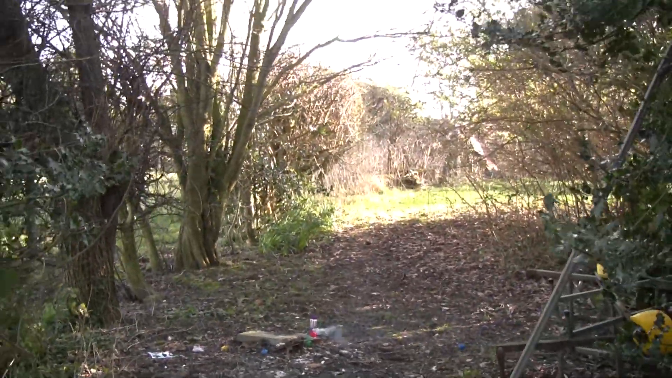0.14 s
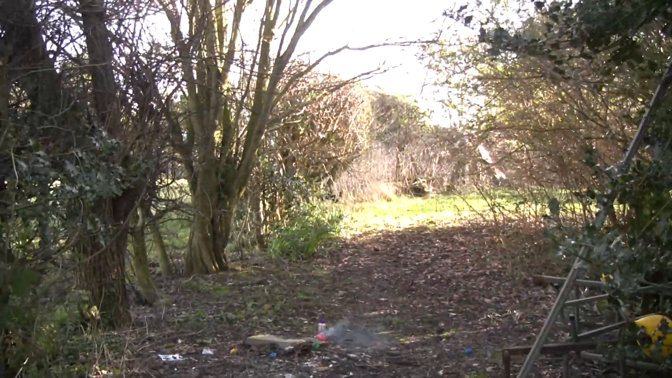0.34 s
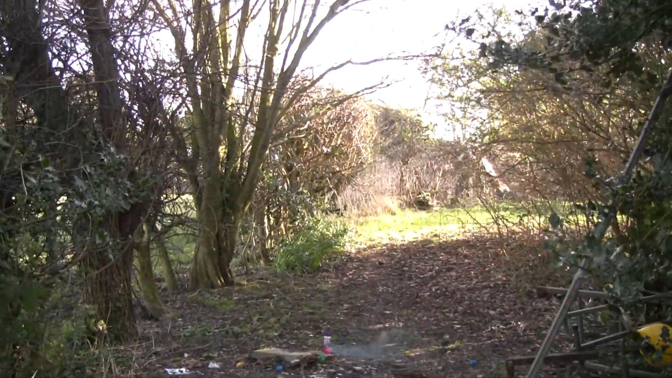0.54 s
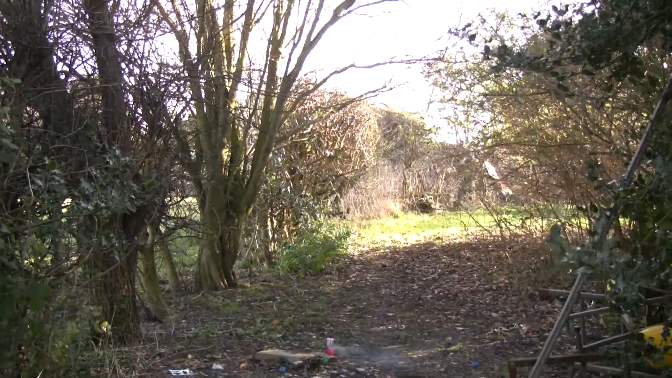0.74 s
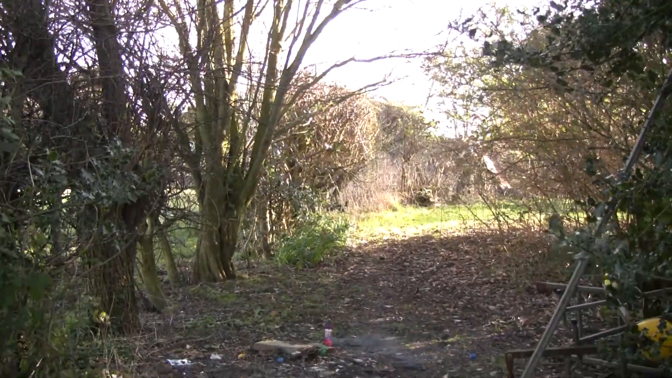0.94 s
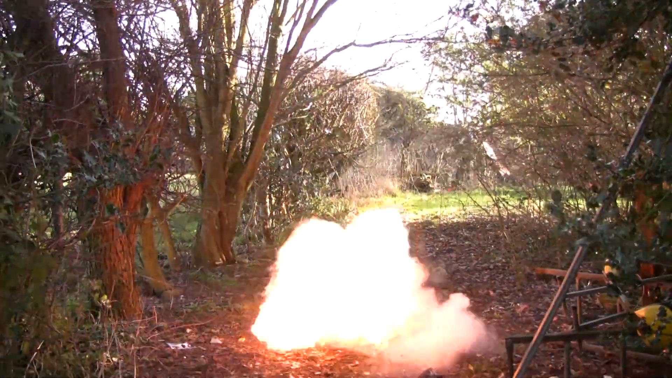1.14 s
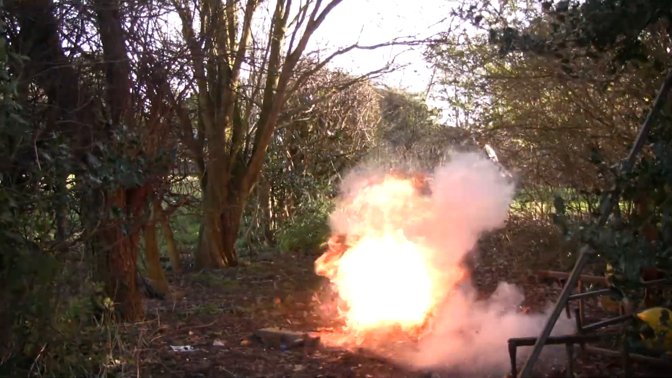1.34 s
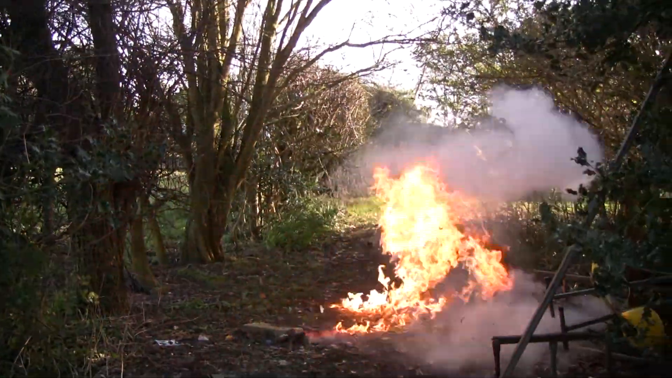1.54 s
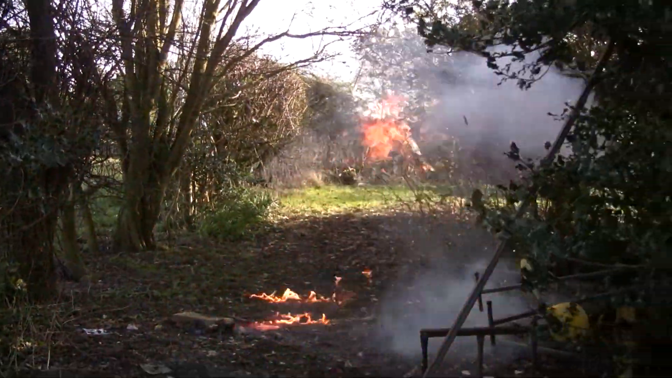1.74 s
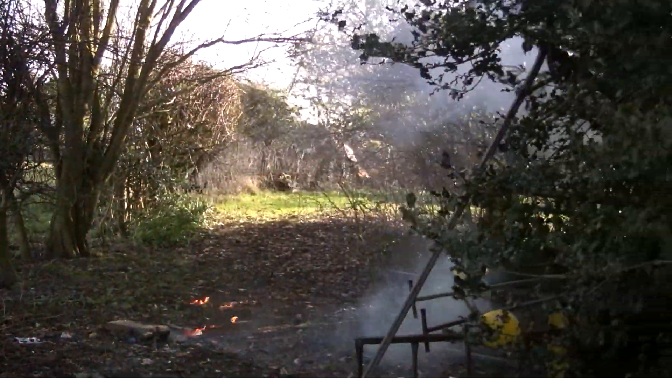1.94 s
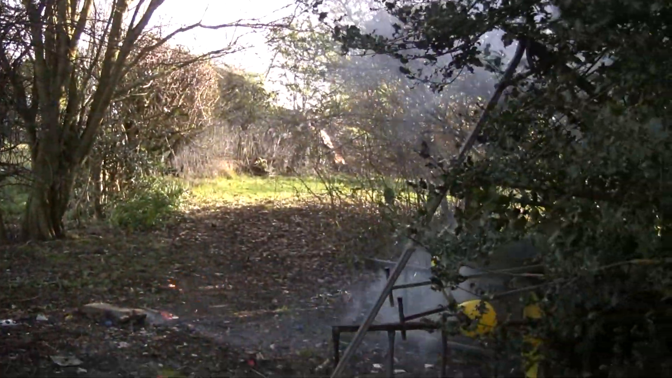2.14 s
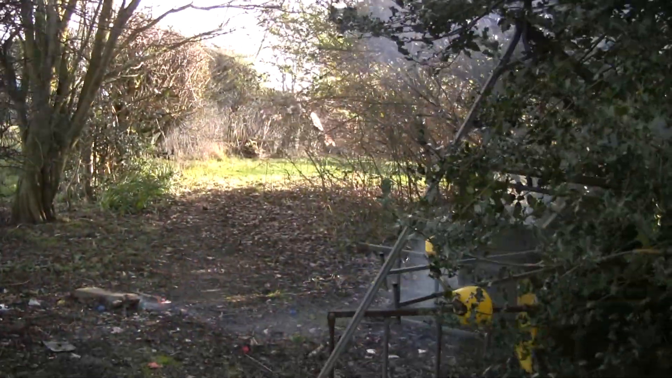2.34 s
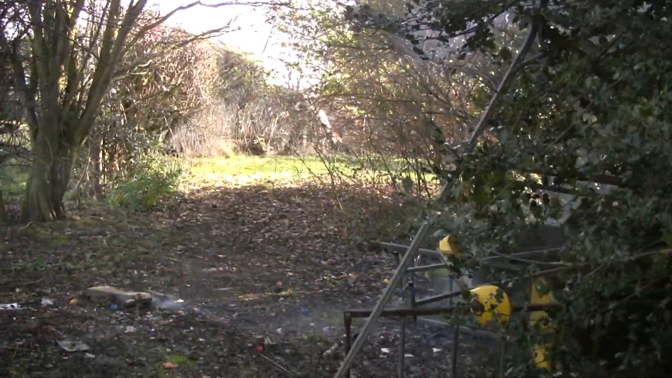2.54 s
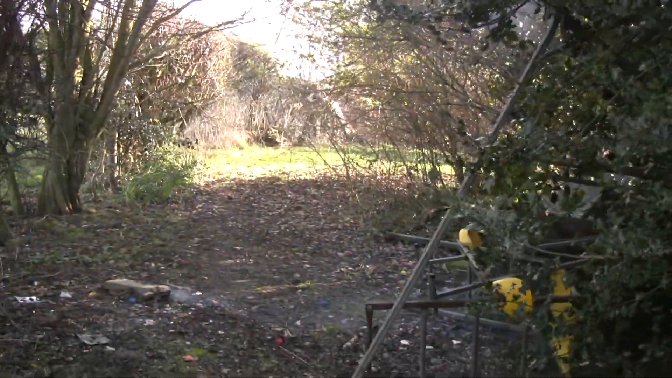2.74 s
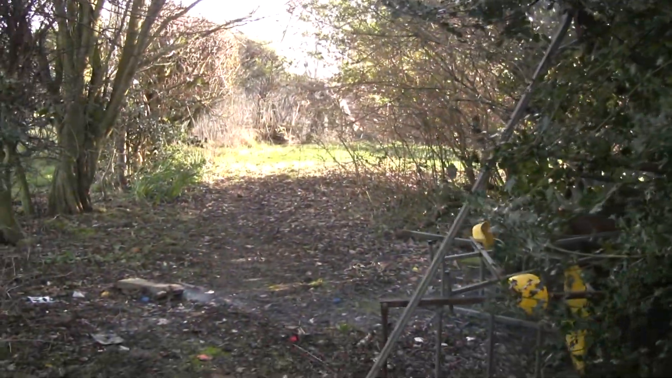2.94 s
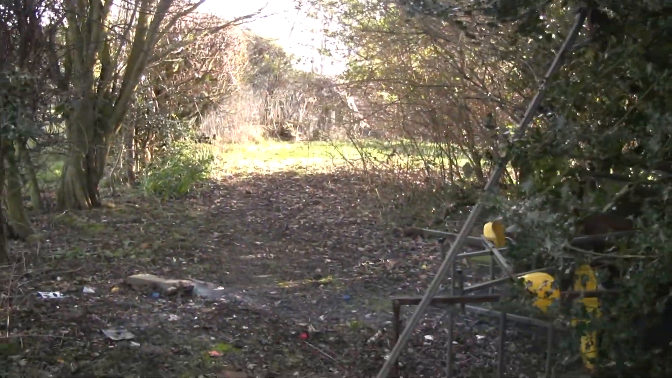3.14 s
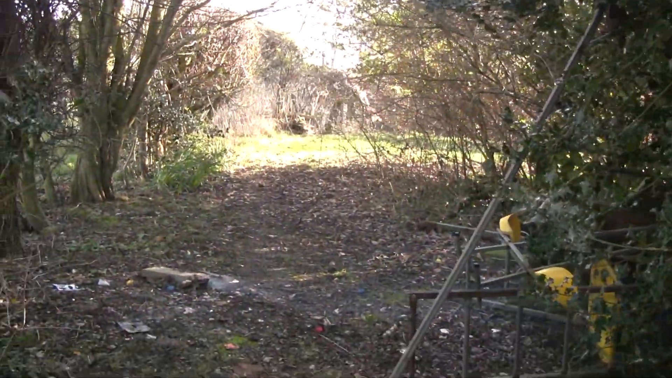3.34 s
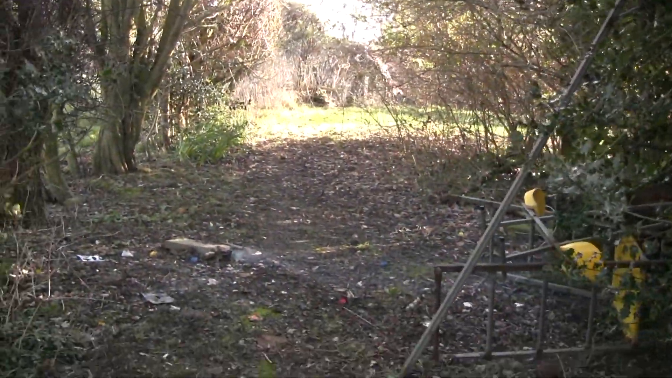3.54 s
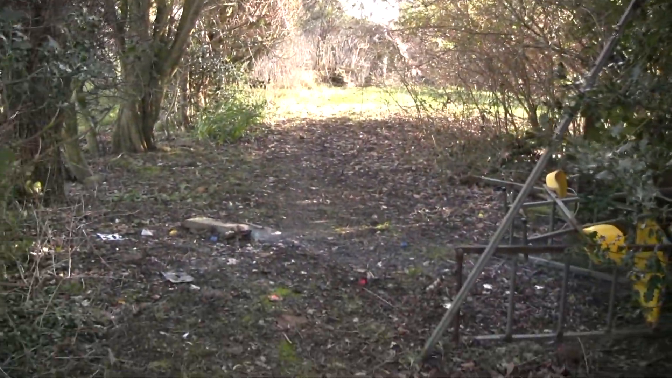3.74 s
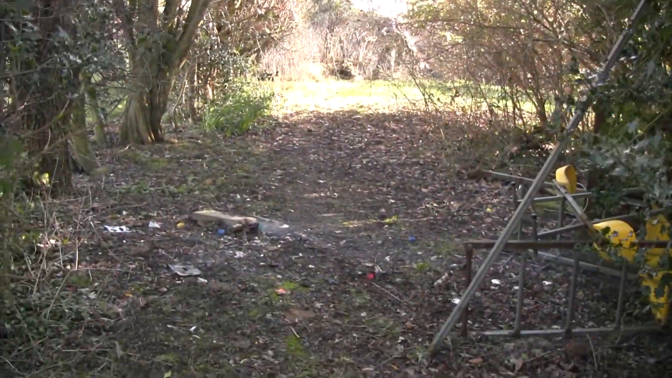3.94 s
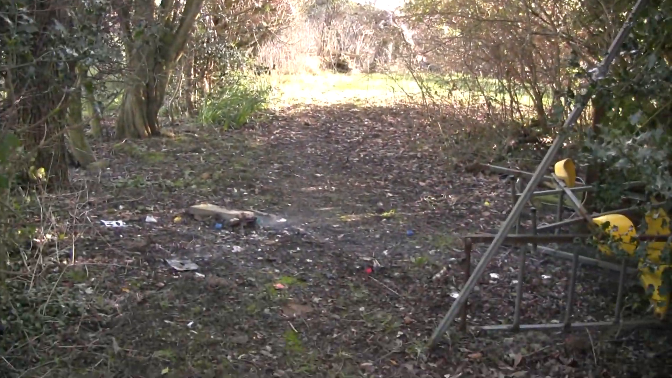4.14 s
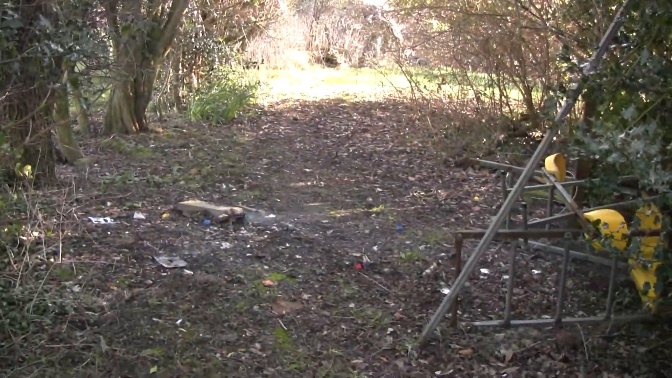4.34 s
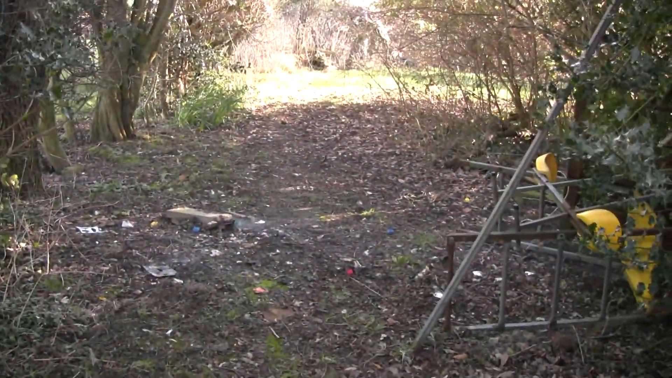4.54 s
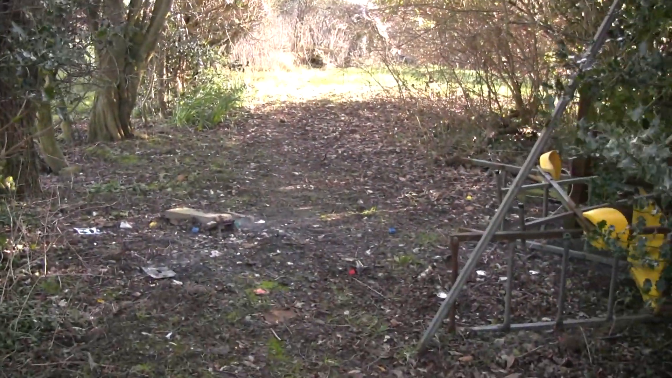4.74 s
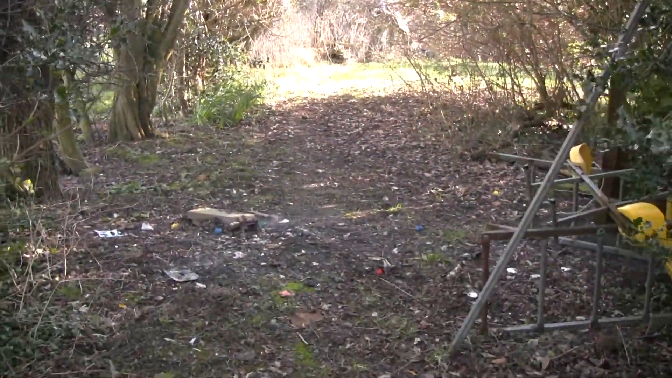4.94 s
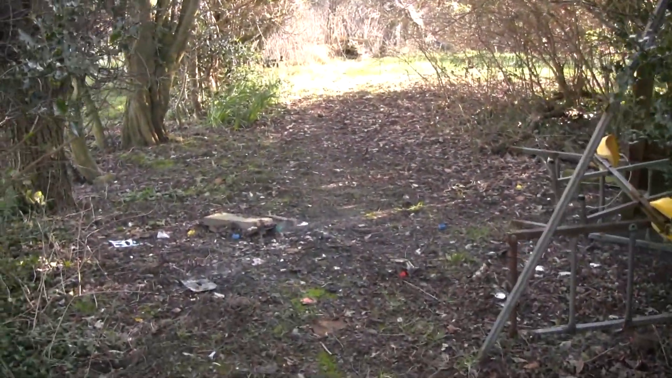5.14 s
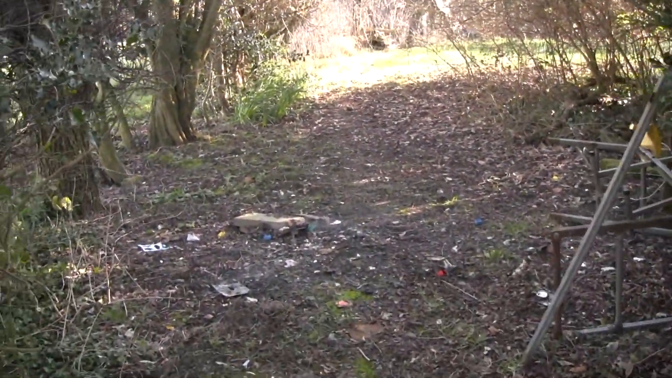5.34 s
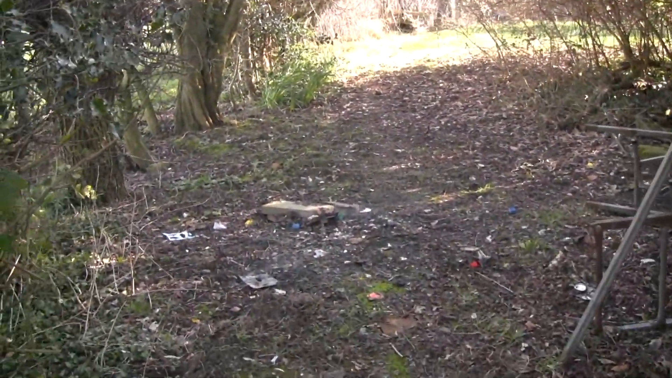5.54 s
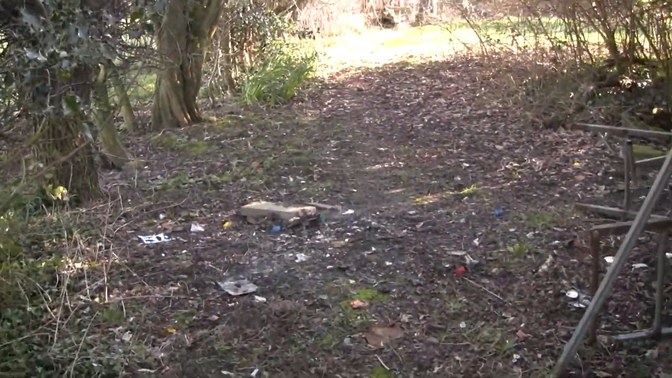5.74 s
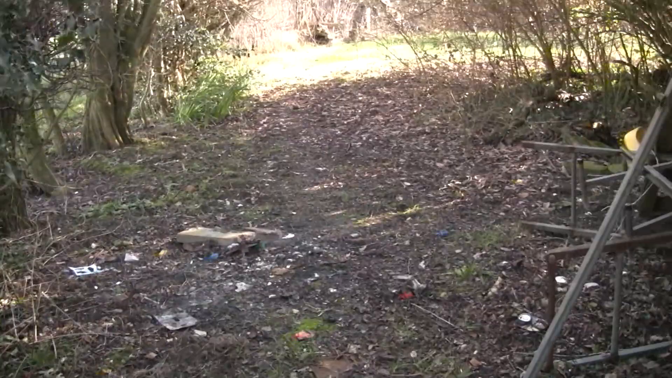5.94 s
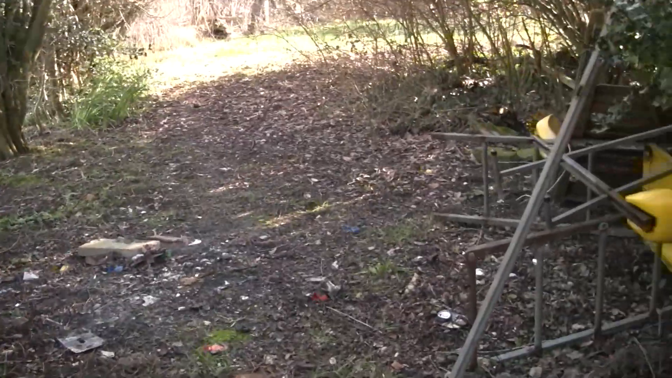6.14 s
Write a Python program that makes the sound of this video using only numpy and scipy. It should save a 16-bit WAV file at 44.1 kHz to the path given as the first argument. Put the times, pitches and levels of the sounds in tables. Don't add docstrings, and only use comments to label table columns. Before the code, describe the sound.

A small handheld camera in woodland hears low wind rumble, a faint whine and a brief spitting fuse. After a second a firecracker explodes close by, flattening the input. Hard slaps and a booming roll come back from the trees while scraps tick and patter through leaves. The background ducks, then returns, and hoarse crows caw far off.

```python
import sys
import numpy as np
from scipy import signal
from scipy.fft import rfft, irfft, next_fast_len
from scipy.io import wavfile
from scipy.ndimage import uniform_filter1d, map_coordinates

SR = 44100
rng = np.random.default_rng(int(sys.argv[2]) if len(sys.argv) > 2 else 0)


def makeup_ratio(level_db):
    decades = np.asarray(level_db, float) / 20
    return 10 ** decades


def materialize(psi):
    bounded = np.clip(np.atleast_2d(psi).T, -1, 1)
    quanta = np.round(bounded * 32767).astype(np.int16)
    wavfile.write(sys.argv[1], SR, quanta)


N = 276727
BANG_S = 1.0812

# hz, level_db
BLAST_COLOUR = [(40, -30), (150, -6.5), (450, -4), (800, -7), (1700, -13), (3300, -11.5), (5000, -19),
                (16000, -38.5)]


def unit(x):
    return x / np.sqrt(np.mean(x ** 2) + 1e-20)


def along(points, hz):
    f, v = np.transpose(points)
    return np.interp(np.log(hz + 1), np.log(f + 1), v)


def curves(rows):
    s, *columns = np.transpose(rows)
    return [np.interp(np.arange(N) / SR, s, column, left=-120) for column in columns]


def wobble(rate):
    knots = rng.standard_normal(int(N * rate / SR) + 4)
    return map_coordinates(knots, [np.arange(N) * rate / SR])


def filtered(x, response):
    m = next_fast_len(N + SR // 2)
    return irfft(rfft(x, m) * response(np.fft.rfftfreq(m, 1 / SR)), m)[..., :N]


def peak(f, hz, width_hz):
    return 1j * f * width_hz / (hz * hz - f * f + 1j * f * width_hz)


def rush(spectrum, patchy_db):
    z = signal.stft(rng.standard_normal(N), nperseg=512)[2]
    field = uniform_filter1d(rng.standard_normal(z.shape), size=6, axis=0)
    field = uniform_filter1d(field, size=10, axis=1)
    noise = signal.istft(z * makeup_ratio(patchy_db * unit(field)), nperseg=512)[1][:N]
    return unit(filtered(noise, lambda hz: makeup_ratio(along(spectrum, hz))))


def swells(rows):
    s, db, rise_s, fall_s = np.transpose(rows)[:, :, None]
    knots_s = np.arange(0, N + SR, SR // 1000) / SR
    level_db = db + 20 * np.minimum((knots_s - s) / rise_s, (s - knots_s) / fall_s)
    return np.interp(np.arange(N) / SR, knots_s, makeup_ratio(level_db.max(axis=0)))


def quiet():
    # hz, level_db
    air_colour = [(160, -12.5), (280, -9), (343, -8), (435, -8.5), (506, -7.5), (570, -9.5), (1030, -8.5),
                  (1830, -22), (3150, -27), (3790, -25), (4410, -30), (5590, -34), (16000, -48)]
    # multiple of the turning rate, level_db
    drum_lines = [(11, -72.5), (12, -67), (13, -63), (14, -63.5), (15, -71), (16, -73), (18, -72.5),
                  (19, -72), (20, -76)]
    drum_hz, air_db = 299.6, -43.5
    turns = 2 * np.pi * drum_hz * np.arange(N) / SR
    whine = np.zeros(N)
    for multiple, db in drum_lines:
        gain = makeup_ratio(db + 2.0 + 0.76 * wobble(4.9))
        whine += gain * np.sin(round(multiple) * turns + rng.uniform(0, 2 * np.pi))
    return makeup_ratio(air_db + 1.5) * rush(air_colour, patchy_db=1.0) + whine


def wind():
    # time_s, level_db
    gusts = [(0, -34), (.15, -29), (1.03, -28), (1.17, -22), (1.71, -32), (2.08, -22), (2.53, -27.5),
             (2.9, -29), (3.21, -29), (3.47, -34.5), (3.75, -29.5), (4.35, -32.5), (4.7, -28.5),
             (5.05, -31.5), (5.3, -40), (5.7, -34), (5.82, -21), (6.0, -41)]
    # hz, level_db (per Hz)
    buffet_colour = [(8.8, -33.5), (15, -15.5), (38, 3), (61, -1), (111, -3.5), (204, -18.5), (272, -27),
                     (400, -33.5), (520, -49.5), (880, -120)]
    level_db, = curves(gusts)
    lumps = makeup_ratio(0.45 * wobble(5.9))
    return makeup_ratio(level_db + 2.0) * unit(lumps * rush(buffet_colour, patchy_db=1))


def crows():
    # full_voice_s, held_s, level_db, beak_hz, throat_db
    calls = [
        (3.22, 0.11, -42, 1430, -1),
        (3.52, .19, -44.5, 1390, -7),
        (3.89, .14, -39.5, 1430, -3.5),
        (4.14, 0.1106, -45, 1430, -4),
        (4.56, .28, -44, 1390, -3.5),
        (5.305, .155, -36.5, 1445, -3),
        (5.7, 0.31, -43, 1430, -8.5),
        (6.22, .1, -39.5, 1356, -9.5),
    ]
    # centre_hz, width_hz, level_db
    throat_modes = [(1795, 550, 0), (3640, 450, -7)]
    rise_s, fall_s, sag_db = .06, .13, 1
    flutter_hz, flutter_db = 57, 2.5

    start, held, db, call_beak, call_throat = np.transpose(calls)[:, :, None]
    knots_s = np.arange(0, N + SR, SR // 1000) / SR
    t = knots_s - start
    attack_db = 20 * t / rise_s
    decay_db = -sag_db * t / held - 20 * np.maximum(t - held, 0) / fall_s
    shape_db = db + np.minimum(attack_db, decay_db)
    now = shape_db.argmax(axis=0)
    rows = np.transpose([knots_s, shape_db.max(axis=0), call_beak[now, 0], call_throat[now, 0]])
    level_db, beak_hz, throat_db = curves(rows)

    pitch_hz = np.clip(beak_hz, 1200, 1650) / 3 * (1 + .02 * wobble(70))
    pulses = np.diff(np.floor(np.cumsum(pitch_hz / SR)), prepend=0) * makeup_ratio(2.8 * wobble(400))
    breath = 2.06 * rng.standard_normal(N)
    source = (unit(pulses) + breath) * makeup_ratio(0.6 * wobble(110))
    flutter_phase = 2 * np.pi * flutter_hz * np.arange(N) / SR + 1.5 * wobble(15)
    source *= makeup_ratio(flutter_db * np.sin(flutter_phase))

    high = np.clip((beak_hz - 1300) / 220, 0, 1)
    low_beak, high_beak = filtered(source, lambda f: [abs(peak(f, hz, 280)) ** 2 for hz in (1330, 1480)])
    beak = low_beak + high * (high_beak - low_beak)
    throat = filtered(source, lambda f: sum(makeup_ratio(g) * abs(peak(f, hz, w)) ** 3 for hz, w, g in throat_modes))
    return makeup_ratio(level_db) * (unit(beak) + makeup_ratio(throat_db - 3.0) * unit(throat))


def rustle():
    # hz, level_db (per Hz)
    leaf_colour = [(800, -28), (1500, 3), (2700, -2.5), (3600, 1.5), (4900, -3), (7000, -1.5),
                   (12300, -4.5), (16000, -10.5)]
    # loudest_s, level_db, rise_s, fall_s (per 20 dB)
    fuse_spits = [
        (.17, -64, .3, .1),
        (.32, -54, .12, .2),
        (.425, -40, .11, .13),
        (.815, -56, .08, .06),
        (.93, -54, .15, .1),
    ]
    # loudest_s, level_db, rise_s, fall_s (per 20 dB)
    stirs = [
        (1.17, -40, .01, 0.26),
        (2.2, -45.5, 0.96, 1.5),
        (3.06, -50, 2.3, 1.6),
        (3.7, -52, 0.98, 1.06),
        (4.5, -51.5, .09, .12),
        (4.95, -64, .3, .4),
        (5.76, -59, .05, .5),
        (5.89, -53, .2, .12),
    ]
    gain = makeup_ratio(-73) + swells(stirs)
    ticks = (rng.random(N) < .008) * makeup_ratio(4.5 * np.minimum(rng.exponential(size=N), 2.6))
    grains = 1 + 1.1 * signal.lfilter([1], [1, -.93], ticks)
    hiss = filtered(grains * rng.standard_normal(N), lambda hz: makeup_ratio(along(leaf_colour, hz)))
    leaves = gain * unit(hiss * makeup_ratio(1.5 * wobble(30)))
    fuse = swells(fuse_spits) * makeup_ratio(1.5 * wobble(60)) * rush(leaf_colour, patchy_db=1.5)
    return makeup_ratio(1.9) * (leaves + fuse)


def debris():
    # time_s, peak_db, centre_hz, rattle_db
    scraps = [(1.3114, -19, 6600, -10), (1.4377, -24.5, 8900, -15), (1.5646, -20, 11900, -15),
              (1.6968, -27, 6740, -4), (1.8824, -25, 6200, -7), (1.8889, -23, 8150, -17),
              (1.9584, -28, 6400, -10), (2.036, -18, 9600, -20), (2.1154, -28.5, 6620, -12),
              (2.1907, -21, 6730, 1), (2.2706, -26, 6940, -8), (2.4324, -23, 9300, -3),
              (2.5658, -21.5, 8950, -10), (2.6087, -27, 8920, -10), (2.707, -22.5, 7100, -10),
              (2.7177, -19.5, 8350, -16), (2.7978, -28.5, 6740, -10), (2.87, -19, 10000, -4),
              (2.9528, -24, 8300, -8), (2.9749, -19, 9100, -20), (3.044, -28.5, 6090, -14),
              (3.1166, -25, 6340, -6), (3.2992, -21.5, 6900, -16), (3.504, -29, 7300, -14),
              (3.5192, -24.5, 6650, -14), (3.6444, -26.5, 10700, -12), (3.8, -18, 7200, -6),
              (4.1777, -31.5, 6200, -4), (5.6259, -32, 6360, -11)]
    # time_s, peak_db, centre_hz, rattle_db
    heavy = [(1.9328, -35, 11300, -3), (1.99, -27, 3300, -8), (2.192, -26, 3600, -14),
             (2.2625, -24, 3700, -10), (2.278, -17, 3900, -14), (2.2945, -20, 3900, -5),
             (2.31, -27, 3800, -4), (2.612, -25, 2900, -10), (2.878, -19, 3700, -11), (3.6, -35, 3300, -14),
             (1.882, -25, 3010, -19.5), (1.96, -19, 4190, -8), (2.2009, -18.5, 3440, -15),
             (2.2696, -7, 3830, -22), (2.3444, -26, 3930, -14), (2.4356, -23.5, 3650, -10),
             (2.4913, -25.5, 3680, -15), (2.5396, -31, 3370, -12), (2.568, -26, 3990, -12),
             (2.7048, -31, 3480, -12), (2.799, -31, 3740, -21), (2.848, -21, 3640, -19),
             (2.8534, -20, 4000, -16), (2.8717, -14.5, 3900, -9), (2.9527, -30, 4220, -1),
             (3.0425, -28, 4490, -12), (3.116, -21, 4230, -20), (3.1303, -19, 3730, -16),
             (3.2755, -31, 3600, -20), (3.504, -33, 3900, -14), (3.547, -31, 3770, -12),
             (3.6466, -23, 3740, -13), (3.687, -32, 3300, -12), (3.735, -34, 3400, -8),
             (3.9245, -35, 3780, -14), (3.9534, -31, 4270, -2), (3.9807, -32, 3370, -17),
             (4.1785, -28, 3810, -6), (4.52, -31, 3870, -12), (5.7179, -24, 3700, -11),
             (5.76, -37, 3700, 0), (5.8, -36, 3500, 0), (5.865, -37, 3600, 0), (5.916, -37, 3100, -14)]
    # time_s, peak_db, centre_hz, rattle_db
    dull = [(1.273, -14, 1500, -8), (1.384, -14, 1100, -12), (1.481, -12, 800, -14),
            (1.499, -14, 1250, -12), (1.5895, -11, 1000, -14), (1.4685, -6, 1100, -18),
            (1.592, -20, 2480, -6), (2.885, -21, 2900, -14), (4.1785, -24, 2600, -20),
            (4.52, -33, 2900, -12), (5.718, -21, 2700, -16)]
    # time_s, peak_db
    earth = [(1.64, -30), (1.7731, -35), (1.8305, -41), (1.8525, -38), (2.0984, -28), (2.3478, -38),
             (2.3962, -29), (2.488, -33), (2.6831, -31), (2.848, -31), (3.1051, -33), (3.1765, -36),
             (3.1904, -31), (3.2752, -35), (3.358, -32), (3.3855, -37.5), (3.4174, -36), (3.6938, -38),
             (3.7247, -34), (3.9532, -36), (4.1303, -37), (4.2331, -39), (4.3977, -34), (4.464, -37),
             (4.496, -36), (4.5199, -38.5), (4.7704, -36.5), (4.9629, -40), (5.667, -41), (6.1655, -41)]
    # time_s, peak_db
    more_earth = [(1.3944, -33), (1.4464, -33), (2.0295, -32), (2.1344, -29), (2.1474, -29), (2.1844, -34),
                  (2.1939, -24), (2.2009, -22), (2.2134, -30), (2.2304, -32), (2.2614, -31), (2.2804, -30),
                  (2.2934, -29), (2.3774, -34), (2.4404, -29), (2.5704, -28), (2.5854, -29), (2.6454, -36),
                  (2.8024, -34), (2.8774, -25), (2.8844, -22), (2.8924, -29), (2.9624, -27), (2.9814, -30),
                  (3.0334, -35), (3.0744, -34), (3.0854, -32), (3.1304, -28), (3.2214, -34), (3.3383, -34),
                  (3.5418, -32), (3.5764, -38), (3.6017, -36), (3.6694, -38), (3.7554, -37), (3.8744, -38),
                  (3.9994, -38), (4.0287, -42), (4.1904, -39), (4.2194, -40), (4.2544, -42), (4.3695, -42),
                  (4.4714, -37), (4.5344, -41), (4.554, -42), (5.686, -44), (5.891, -41)]
    # time_s, peak_db
    sparks = [(0.386, -28), (0.4584, -33), (0.4804, -34), (0.5018, -35), (0.5234, -37), (0.5342, -36),
              (0.5424, -38), (0.5746, -38), (0.5814, -39), (0.7841, -36), (0.8051, -33), (0.8235, -30),
              (0.8504, -44), (0.9313, -40), (1.0276, -43)]
    # pitch_hz, level_db, t60_s
    shard_modes = [(6950, -5.5, .03), (7840, -14, 0.07), (10360, -11, 0.054), (12080, -14, 0.17),
                   (11580, -0.5, .04), (14800, -10.5, 0.028)]
    # time_s, level_db
    shard_hits = [
        (1.313, -36),
        (1.5648, -27.5),
        (1.7728, -44),
    ]

    out, t = np.zeros(N + SR), np.arange(4096) / SR
    f = np.fft.rfftfreq(len(t), 1 / SR)
    light = scraps + [(s, db, 8200 * np.exp(.22 * rng.normal()), -15) for s, db in earth + more_earth]
    light += [(s, db, 10500, -18) for s, db in sparks]
    # Pieces, sharpness and skirt of the resonances, s for tick and rattle to fall 60 dB
    kinds = [(light, 1.4, 1.4, .0028, .1), (heavy, 5.5, .25, .008, .1), (dull, 1.4, 1.2, .008, .08)]
    for rows, sharpness, skirt, tick_s, rattle_s in kinds:
        s, db, hz, rattle_db = np.transpose(rows)[:, :, None]
        noise, chance = rng.standard_normal((len(rows), 2, len(t))).transpose(1, 0, 2)
        bounces = 0.3 + signal.lfilter([2.2], [1, -.95], chance > 2.45)
        fall = makeup_ratio(-60 * t / tick_s) + makeup_ratio(rattle_db - 60 * t / rattle_s) * bounces
        body = peak(f, hz, hz / sharpness) * peak(f, hz, skirt * hz)
        burst = irfft(rfft(noise * fall) * body)
        burst *= makeup_ratio(db - 0.5) / np.abs(burst).max(axis=1, keepdims=True)
        places = np.round(s * SR).astype(int) + np.arange(len(t))
        out += np.bincount(places.ravel(), burst.ravel(), len(out))
    for s, db in shard_hits:
        for hz, mode_db, t60_s in shard_modes:
            ring_db = db + mode_db + rng.normal(0, 2.5) - 60 * t / t60_s
            out[round(s * SR):][:len(t)] += makeup_ratio(ring_db) * np.sin(2 * np.pi * hz * t)
    return out[:N]


def slaps():
    # centre_s, peak_db, swing_hz, edge_db
    echoes = [(1.236, -11, 300, -14), (1.246, -9, 280, -14), (1.263, -10, 350, -8), (1.33, -12, 280, -14),
              (1.352, -10, 230, -14), (1.435, -9, 250, -16), (1.52, -13, 250, -18), (1.545, -13, 230, -18),
              (1.572, -13, 260, -20), (1.588, -10, 280, -14), (1.648, -10, 230, -26), (1.68, -13, 200, -24),
              (1.701, -11, 220, -22), (1.732, -14, 200, -22), (1.2247, -11.5, 332, -1),
              (1.2696, 2, 313, -23.5), (1.3916, -6, 184, -12), (1.468, -18, 400, -13),
              (1.485, -11.5, 245, -23), (1.612, 1.5, 242, -28), (1.6232, -3.5, 247, -23),
              (1.8767, -18, 260, -18), (2.12, -1.5, 165, -26), (2.130, -8.5, 196, -28.5),
              (2.308, -16, 190, -13), (2.705, -19, 166, -29.5), (5.775, -14.5, 160, -22)]
    out, t = np.zeros(N + SR), np.arange(-SR // 100, SR // 25) / SR
    for s, db, hz, edge_db in echoes:
        swing = -1.4 * np.sin(2 * np.pi * hz * t) * np.exp(-(1.82 * hz * t) ** 2)
        rough = signal.lfilter(*signal.butter(3, 3000, fs=SR), rng.standard_normal(len(t))) * 1.5
        edge = (t > 0) * makeup_ratio(edge_db - 60 * t / .04) * rough
        out[round((s - .01) * SR):][:len(t)] += makeup_ratio(db - 1.5) * (swing + edge)
    return out[:N]


def roll():
    # loudest_s, level_db, rise_s, fall_s (per 20 dB)
    slope_echoes = [
        (1.4, -17.5, .7, 1.49),
        (1.78, -19, .5, .8),
        (2.37, -20, 2.5, .85),
        (4.25, -44, 2, 0.6),
    ]
    # loudest_s, level_db, rise_s, fall_s (per 20 dB)
    tree_echoes = [
        (1.27, -16.5, 0.12, .2),
        (1.47, -19.5, 1.45, .45),
        (1.95, -28, 1.7, 1.5),
        (2.72, -29.5, 5, 1.4),
        (3.55, -41.5, .4, .5),
    ]
    # hz, level_db (per Hz)
    boom_colour = [(50, -40), (80, -7.5), (123, -5.5), (166, -0.5), (250, -5), (350, -13), (500, -19.5),
                   (900, -69)]
    crash_colour = [(180, -14), (300, -5), (545, -6), (1200, -9), (2700, -24.5), (3520, -25), (4300, -30.5),
                    (9000, -49), (16000, -68)]
    fizz_colour = [(900, -43.5), (1600, 3), (2700, -2.5), (3600, -2), (4400, -13), (7000, -39),
                   (16000, -52)]
    lumps, late = wobble(35.0), np.arange(N) / SR - BANG_S
    boom = unit(makeup_ratio(1.0 * lumps) * rush(boom_colour, patchy_db=2.0))
    crash = unit(makeup_ratio(0.7 * lumps + 1.6 * wobble(60)) * rush(crash_colour, patchy_db=1.5))
    far = np.clip((late - .06) / 0.053, 0, 1) * (swells(slope_echoes) * boom + swells(tree_echoes) * crash)
    fizz_gain = np.clip((late - .06) / 0.12, 0, 1) ** 1.1 * makeup_ratio(-18 - 26.1 * late)
    return far + fizz_gain * rush(fizz_colour, patchy_db=1.2)


def blast():
    # after_bang_s, level_db
    trunk_fall = [(0, 22), (.02, 15), (.045, 1), (.065, -10), (.08, -17), (.09, -22), (.11, -28), (.3, -70)]
    # hz, level_db
    ground_colour = [(60, -36), (200, -13), (420, 0), (700, -5), (1500, -30)]
    t = np.arange(N) / SR - BANG_S
    u = np.maximum(t, 0) / 0.00017
    front = (t >= 0) * makeup_ratio(18) * (1 - u) * np.exp(-u / 4)
    level_db, = curves([(BANG_S + s, db) for s, db in trunk_fall])
    thump = (t >= 0) * makeup_ratio(26 - 60 * np.maximum(t, 0) / .06) * rush(ground_colour, patchy_db=1)
    suction = 0.54 * np.clip(1.6 - t / 0.061, 0, 1)
    return front + thump + makeup_ratio(level_db) * (rush(BLAST_COLOUR, patchy_db=2) - suction)


def ports(mid):
    # hz, level_db (per Hz)
    hiss_colour = [(3000, -40), (7000, 1), (15000, -2), (16500, -20)]
    mismatch, cut_hz, alike_above_hz = .88, 18, 500
    side = filtered(mid, lambda hz: -mismatch * cut_hz / (cut_hz + 1j * hz) / (1 + (hz / alike_above_hz) ** 2))
    late = np.arange(N) / SR - BANG_S
    uneven = unit(filtered(rng.standard_normal(N), lambda hz: makeup_ratio(along(BLAST_COLOUR, hz) / 2)))
    side += (late > 0) * makeup_ratio(-13 - 60 * np.abs(late) / .05) * uneven
    side += makeup_ratio(-80) * rush(hiss_colour, patchy_db=.3)
    return np.array([mid + side, mid - side])


def scene():
    ducked_db = np.interp(np.arange(N) / SR, [BANG_S, 1.1, 1.6, 2.4], [0, -16.5, -15.0, 1])
    background = makeup_ratio(ducked_db) * (wind() + quiet())
    mid = background + crows() + rustle() + debris() + slaps() + roll() + blast()
    return np.array([mid, mid])


def low_pass(x):
    return signal.sosfilt(signal.butter(12, 16120, fs=SR, output="sos"), x)


def record(dry):
    # time_s, level_db
    ceiling = [(0, -.6), (1.0995, -.6), (1.1005, -7), (1.115, -7.6), (1.145, -9.4), (1.17, -9), (1.21, -4),
               (1.24, 0), (6.3, 0)]
    top = makeup_ratio(np.interp(np.arange(N) / SR, *np.transpose(ceiling)))
    flat = dry[0] / top / (1 + np.abs(dry[0] / top) ** 8) ** (1 / 8)

    def microphone(f):
        capacitor = 1j * f / (4.6 + 1j * f)
        cavity = 1 + 0.073 * peak(f, 3750, 700)
        return capacitor * cavity / (1 + (f / 17000) ** 4) ** .25

    tilted = top * filtered(0.95 * flat, microphone)
    return low_pass(np.clip(ports(tilted), -1, 1))


dry = scene()
out = record(dry)
materialize(out)
```